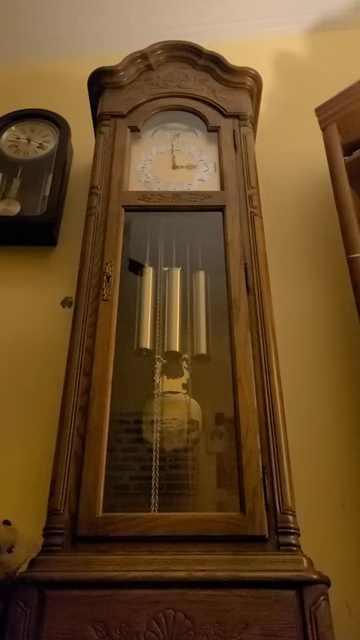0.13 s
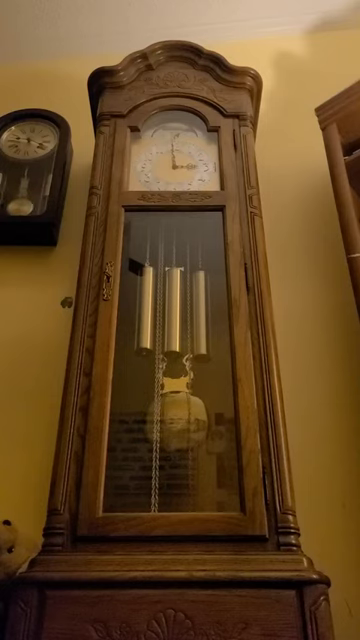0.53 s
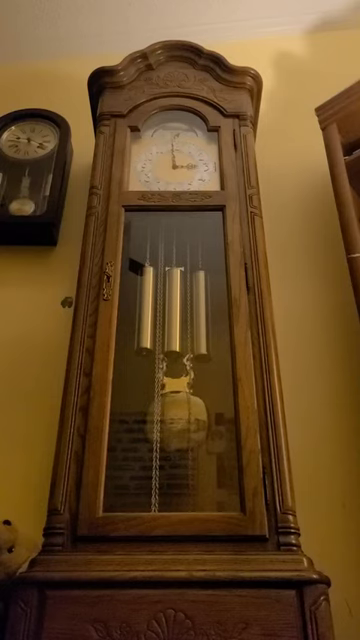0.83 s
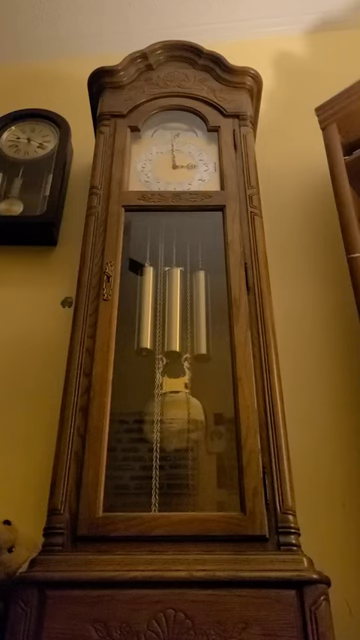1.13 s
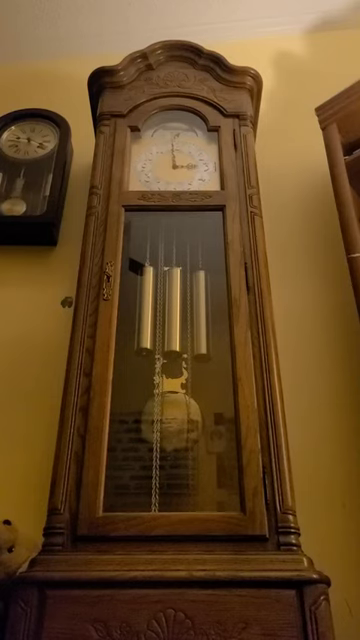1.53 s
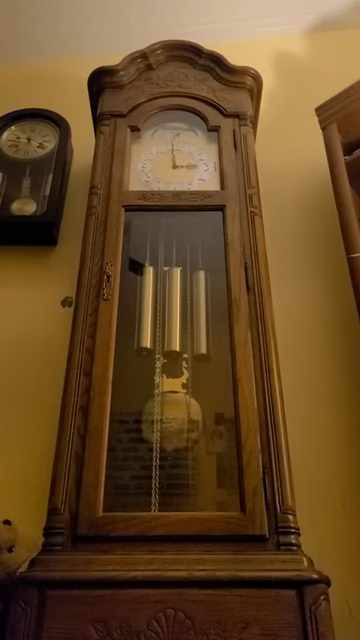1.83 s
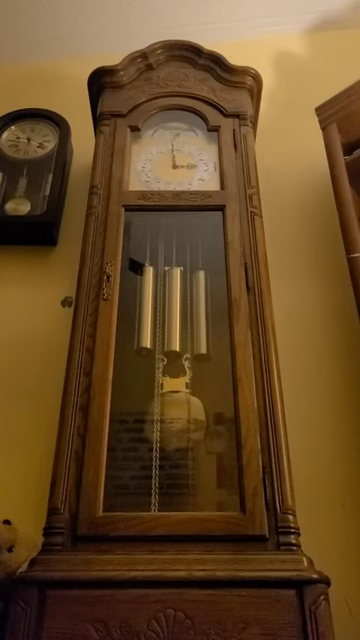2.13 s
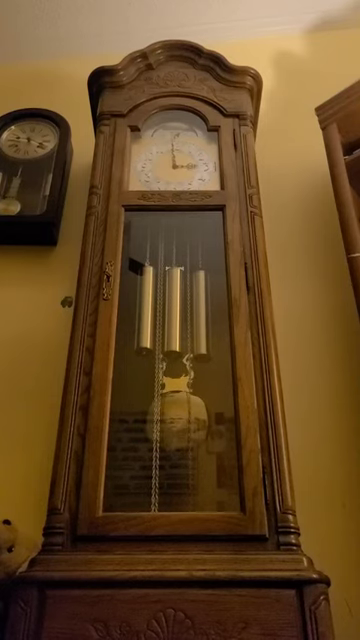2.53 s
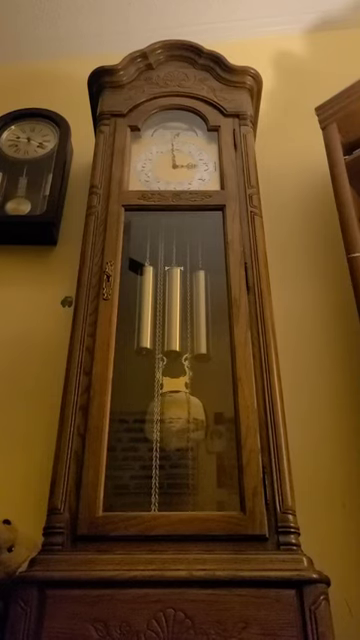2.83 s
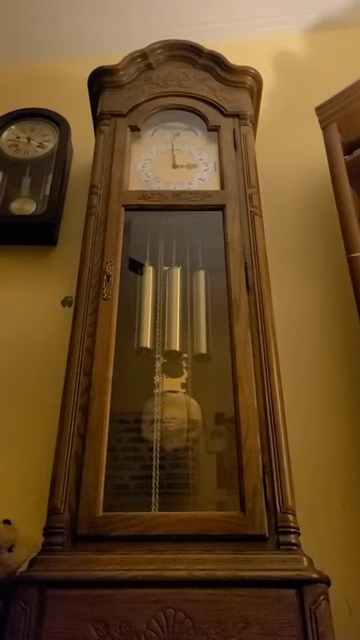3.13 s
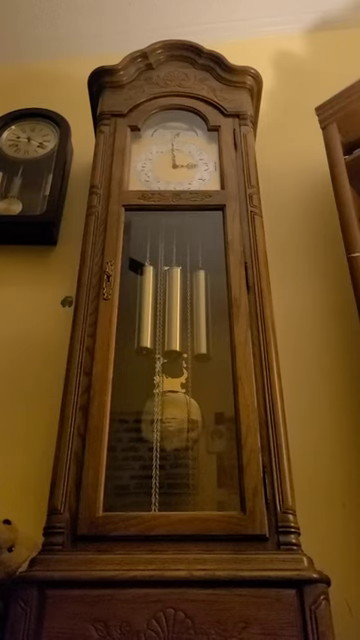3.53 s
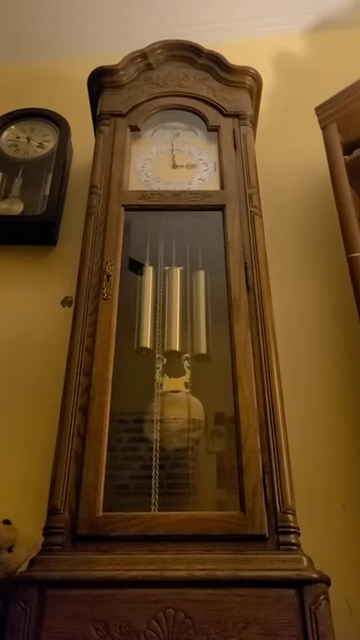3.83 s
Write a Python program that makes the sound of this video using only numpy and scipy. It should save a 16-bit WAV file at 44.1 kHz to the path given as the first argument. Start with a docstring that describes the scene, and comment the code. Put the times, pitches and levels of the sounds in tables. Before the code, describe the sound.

Slow tick-tock of a tall pendulum clock, with fainter clocks and a low room rumble.

```python
"""A longcase pendulum clock ticks, slightly out of beat, in a quiet room.
Each drop of the escapement is an impact: it cracks, excites the damped modes of the brass movement
and reverberates in the wooden case and the room. Two much fainter clocks keep their own quicker
beats, and a few thin clicks sound close by near the end, all over a low room rumble."""
import sys
import numpy as np
from scipy import signal
from scipy.fft import rfft, irfft, next_fast_len
from scipy.io import wavfile

SR = 44100
rng = np.random.default_rng(int(sys.argv[2]) if len(sys.argv) > 2 else 0)


def generate_wav(signal):
    """Clip the signal to [-1, 1] and save it as 16-bit WAV at the path in sys.argv[1]."""
    frames = np.transpose(np.atleast_2d(signal))
    scaled = np.clip(frames, -1, 1) * 32767
    pcm = np.round(scaled).astype(np.int16)
    wavfile.write(sys.argv[1], SR, pcm)


N = 175077

# spectrum of the room's rumble and hiss: frequency_hz, density_db
ROOM_SPECTRUM = [(20, -10), (42, -5.5), (52, -5), (66, 0.5), (85, -4), (112, 0.5), (135, -13.5), (165, -9),
                 (270, -20.5), (400, -21), (600, -28.5), (1000, -39.5), (2000, -42), (3000, -42.5),
                 (5000, -54), (9000, -57.5), (15000, -60)]
# narrow hums in the room: pitch_hz, width_hz, level_db
ROOM_HUMS = [(66.4, 5, -59), (220.7, 3.2, -63), (257.5, 11, -72.5), (435, 3.1, -77.5), (740, 1.8, -82)]
# balance of the room noise: frequency_hz, right_minus_left_db
ROOM_BALANCE = [(200, 2.7), (900, 4.5), (3500, 1.5), (8000, -2.5)]
# drops on the first and second pallet: start_s, level_db, ring_db, tilt_db_per_octave, accent_db
TICK_DROPS = [(.1025, 1.5, -9, 1, 7), (1.2890, -0.5, 2, 1, 0), (2.4705, 0, -1, 0.5, 1),
              (3.6495, -0.5, 1.5, 0.5, 0)]
TOCK_DROPS = [(.6630, 0.5, 0.5, -1.5, -2), (1.8445, 1, 0, -2, -0.5), (3.0275, 1, -4, -2.5, 0.5)]
# response of the wooden case to each pallet: frequency_hz, density_db
TICK_CASE_SPECTRUM = [(500, -13), (1000, -21), (1400, -8), (1580, -2), (1760, -9.5), (2100, -1.5),
                      (2400, -9.5), (3080, 0), (3550, -10.5), (4100, -28), (4700, -9), (5600, -20),
                      (7000, -22.5), (9800, -40), (11500, -32), (15000, -47)]
TOCK_CASE_SPECTRUM = [(500, -28.5), (1000, -35), (1250, -13), (1580, -12.5), (1760, -10.5), (2200, 0),
                      (2380, -7), (2750, 5.5), (3250, -3.5), (3600, -8.5), (4150, -22), (4700, -5.5),
                      (5700, -17.5), (7500, -35.5), (8100, -15), (9600, -69), (11600, -19), (15000, -42.5)]
# crack of tooth on pallet: frequency_hz, density_db
CRACK_SPECTRUM = [(600, -26.5), (1550, -14.5), (1900, -8), (2800, 8.5), (3500, -2), (4100, -13), (4800, -4),
                  (6000, -22.5), (9500, -32), (11500, -24.5), (15000, -31)]
# early reflections of the crack from case and walls: delay_s, level_db
CRACK_ECHOES = [(0.0143, -10.5), (.0235, -7), (0.035, -11.5)]
# modes of the brass movement: pitch_hz, t60_s, tick_db, tock_db
BRASS_MODES = [(1600.5, 0.31, 1.5, -11.5), (1537, 0.055, -14, -5.5), (1616, 0.17, 3, -8.5),
               (1718, 0.4, -19, -33), (1923, .32, -13.5, -29), (2030, 0.26, -17, -16),
               (2145, 0.41, -16, -15.5), (2260, 0.22, -28, -14), (2593, .27, -13.5, -8),
               (2644, 0.32, -12.5, -13), (2728, .28, -17, -10), (2801, 0.24, -14, -6.5),
               (2850, .27, -26, -31), (2935, 0.22, -35, -6), (3036, 0.35, -10, -12), (3100, 0.2, -29, -20),
               (3300, 0.18, -11, -20), (3557, 0.23, -11.5, -11), (4680, 0.41, -26, -23.5)]
# beats of the wall clock: start_s, level_db
WALL_CLOCK_BEATS = [(.255, 3.5), (.655, 0), (1.055, 1), (1.454, 3.5), (1.855, 10.5), (2.256, 4.5),
                    (2.655, -2.5), (3.055, 5.5), (3.857, 3.5)]
# modes of the wall clock: pitch_hz, t60_s, level_db
WALL_CLOCK_MODES = [(1159, 0.18, -65.5), (1225, 0.069, -78), (1540, 0.19, -65), (1610, 0.097, -66)]
# diffuse part of the wall clock's beat: frequency_hz, density_db
WALL_CLOCK_SPECTRUM = [(700, -18), (1050, -31.5), (1180, 7.5), (1360, -1), (1560, 3.5), (1750, -26),
                       (3000, -20), (6000, -30), (15000, -24)]
# beats of the small distant clock: start_s, level_db, pitch_hz
SMALL_CLOCK_BEATS = [(0.296, 2, 6200), (.608, 8, 4680), (.955, 4.5, 4850), (1.608, 1.5, 5000),
                     (2.278, 0.5, 6100), (2.955, 7.5, 5440), (3.285, 2.5, 6100), (3.609, -1, 4800),
                     (3.95, 1, 4900)]
# broad spectrum beneath the small clock's resonance: frequency_hz, density_db
SMALL_CLOCK_SPECTRUM = [(800, 4), (1700, 1), (3000, 2.5), (8000, -7.5), (15000, -21)]
# thin clicks close by: start_s, level_db, right_minus_left_db, tilt_db_per_octave
NEAR_CLICKS = [(3.2512, -5.5, 7, 0), (3.2792, -1, 9.5, -2.5), (3.449, -9, 13, -2), (3.4582, 1.5, 10, -1)]
# spectrum of a click: frequency_hz, density_db
CLICK_SPECTRUM = [(100, -2), (400, -6), (700, 0), (1100, -2), (1500, -1.5), (2000, -18), (2800, -6.5),
                  (5000, -15.5), (7500, -17), (10000, -25), (15000, -24)]

CASE_DB, BRASS_DB, SLIDE_DB, TAIL_DB = -46, -39.5, -8.5, -23
ROOM_DB, WALL_DB, SMALL_DB, CLICK_DB = -48, -70, -76, -39.5
SLIDE_S, CRACK_S, RING_RISE_S, TREBLE_DECAY_S = 0.0072, 0.0028, 0.004, 0.41  # time constants
CASE_HOLD_S, CASE_CORRELATION = 0.041, 0.017
VARIATION = 0.3  # amplitude share of the case noise that is new on each beat


def undb(db):
    """Amplitude grows tenfold for every 20 dB."""
    return 10 ** (np.asarray(db) / 20)


def fade(t, t60, hold_s=0):
    """Exponential decay: after the hold, 60 dB is lost every t60 seconds."""
    return np.exp(-np.log(1000) * np.maximum(t - hold_s, 0) / t60)


def rise(t, rise_s):
    """Exponential build-up toward full amplitude."""
    return 1 - np.exp(-t / rise_s)


def pan(db):
    """Interaural level difference: left and right gains, the right louder by db."""
    return undb(np.array([[-db], [db]]) / 2)


def noise_pair(size, correlation):
    """Partial coherence: sum and difference of two noises give correlated left and right."""
    mid, side = rng.standard_normal((2, size))
    return np.sqrt((1 + correlation) / 2) * mid + np.sqrt((1 - correlation) / 2) * np.array([side, -side])


def curve(points, tilt_db=0):
    """Spectral envelope in dB against log frequency, tilted by tilt_db per octave."""
    hz, db = np.array(points).T
    return lambda f: np.interp(np.log(f), np.log(hz), db + tilt_db * np.log2(hz / hz.mean()))


def peak(f, centre_hz, width_oct):
    """Spectral peak of unit height, Gaussian in log frequency."""
    return np.exp(-(np.log2(f / centre_hz) / width_oct) ** 2)


def colour(x, db_at):
    """Minimum-phase filtering to a spectral envelope; white noise keeps its power."""
    n = 2 * next_fast_len(x.shape[-1])
    gain = undb(db_at(np.maximum(np.fft.rfftfreq(n, 1 / SR), 1)))
    cepstrum = irfft(np.log(gain / np.sqrt(np.mean(gain ** 2))))
    cepstrum[1:n // 2] *= 2  # folding onto positive time makes the filter causal
    cepstrum[n // 2 + 1:] = 0
    return irfft(rfft(x, n) * np.exp(rfft(cepstrum)))[..., :x.shape[-1]]


def room_noise():
    """A diffuse field is coherent only at long wavelengths: shared rumble and hums, scattered hiss."""
    f = np.fft.rfftfreq(N, 1 / SR)
    mid, side = rfft(rng.standard_normal((2, N)))
    coherence = 0.88 / (1 + (f / 690) ** 2)  # halved at 690 Hz
    air = np.sqrt(1 + coherence) * mid + np.sqrt(1 - coherence) * np.array([side, -side])
    out = undb(ROOM_DB) * colour(irfft(air, N) / np.sqrt(2), curve(ROOM_SPECTRUM))
    for hz, width_hz, db in ROOM_HUMS:
        hum = irfft(rfft(rng.standard_normal(N)) / (1 + (2 * (f - hz) / width_hz) ** 2), N)
        out += undb(db) * hum / hum.std()
    balance_db = curve(ROOM_BALANCE)(np.maximum(f, 1))
    return irfft(rfft(out) * undb(np.array([-balance_db, balance_db]) / 2), N)


def add(out, start_s, sound):
    """Superposition: a sound adds to the mix from start_s onward."""
    i = max(int(start_s * SR), 0)
    out[:, i:i + sound.shape[1]] += sound[:, :max(N - i, 0)]


def tooth_slide(t):
    """Sliding friction: noise swells as the tooth leaves the pallet just before the drop."""
    return undb(SLIDE_DB) * noise_pair(len(t), CASE_CORRELATION) * np.exp(-t[::-1] / SLIDE_S)


def case_reverberation(t, shared_noise, rise_s):
    """Dense reflections build up, hold and decay; damping takes the treble first."""
    envelope = rise(t, rise_s) * (fade(t, t60=0.27, hold_s=CASE_HOLD_S) + undb(TAIL_DB) * fade(t, t60=0.9))
    new_noise = noise_pair(len(t), CASE_CORRELATION)
    reflections = envelope * (np.sqrt(1 - VARIATION ** 2) * shared_noise + VARIATION * new_noise)
    treble = signal.sosfilt(signal.butter(1, 7000, "high", fs=SR, output="sos"), reflections)
    return reflections - treble * rise(t, TREBLE_DECAY_S)


def tooth_crack(t, left_lag_s=0.00056):
    """A brief impact is broadband; it reaches the right ear first, and early reflections follow."""
    right = rng.standard_normal(len(t)) * np.exp(-t / CRACK_S)
    left = np.interp(t - left_lag_s, t, right, left=0)
    echoes = sum(undb(db) * (t >= lag) * np.exp(-np.abs(t - lag) / CRACK_S) for lag, db in CRACK_ECHOES)
    return np.array([left, right]) + echoes * noise_pair(len(t), 0)


def brass_ring(t, mode_db, phases, accent):
    """Free vibration: the movement rings in damped modes, varying a little in level and pitch."""
    ring = np.zeros((2, len(t)))
    for (hz, t60, _, _), db, phase in zip(BRASS_MODES, mode_db, phases):
        jitter_db, detune = rng.normal(0, (1, 0.0012))
        amplitude = undb(db + 2 * accent(hz) + jitter_db) * fade(t, t60)
        ring += amplitude * np.sin(2 * np.pi * hz * (1 + detune) * t + phase)
    return ring * rise(t, RING_RISE_S)


def pallet(drops, case_spectrum, mode_db, crack_db, rise_s):
    """Impact excitation: each drop on one pallet sums slide, reverberation, crack and ringing brass."""
    out, t = np.zeros((2, N)), np.arange(SR * 3 // 5) / SR
    slide_t = t[:SR // 40]
    shared_noise = noise_pair(len(t), CASE_CORRELATION)
    phases = rng.uniform(0, 2 * np.pi, (len(BRASS_MODES), 1, 1))
    phases = phases + rng.normal(0, 0.6, (len(BRASS_MODES), 2, 1))  # offset at each ear
    for start_s, db, ring_db, tilt_db, accent_db in drops:
        accent = lambda f: accent_db * peak(f, centre_hz=3250, width_oct=0.16)
        reverberation = case_reverberation(t, shared_noise, rise_s)
        case = np.hstack([tooth_slide(slide_t), reverberation])
        case = colour(case, lambda f: curve(case_spectrum, tilt_db)(f) + accent(f))
        crack = colour(tooth_crack(t), lambda f: curve(CRACK_SPECTRUM)(f) + accent(f))
        add(out, start_s - slide_t[-1], undb(CASE_DB + db) * case)
        add(out, start_s, undb(crack_db + db) * crack)
        add(out, start_s, undb(BRASS_DB + db + ring_db) * brass_ring(t, mode_db, phases, accent))
    return out


def longcase_clock():
    """Modal weighting: tick and tock excite the same modes in different proportions."""
    _, _, tick_db, tock_db = np.array(BRASS_MODES).T
    ticks = pallet(TICK_DROPS, TICK_CASE_SPECTRUM, tick_db, crack_db=-38.5, rise_s=0.0013)
    tocks = pallet(TOCK_DROPS, TOCK_CASE_SPECTRUM, tock_db, crack_db=-34.5, rise_s=0.0069)
    return (ticks + tocks) * pan(db=4)


def diffuse_beat(t, rise_s, hold_s, t60):
    """Reverberation blurs a distant tick into decaying noise, independent at each ear."""
    return noise_pair(len(t), 0) * rise(t, rise_s) * fade(t, t60, hold_s)


def wall_clock():
    """Two pairs of damped modes give a soft two-toned beat, blurred by the room."""
    out, t = np.zeros((2, N)), np.arange(SR // 2) / SR
    for start_s, db in WALL_CLOCK_BEATS:
        for hz, t60, mode_db in WALL_CLOCK_MODES:
            phase = rng.uniform(0, 2 * np.pi) + rng.normal(0, 0.62, (2, 1))
            amplitude = undb(db + mode_db) * rise(t, RING_RISE_S) * fade(t, t60)
            add(out, start_s, amplitude * np.sin(2 * np.pi * hz * t + phase))
        beat = diffuse_beat(t, rise_s=0.002, hold_s=0.0096, t60=0.52)
        add(out, start_s, undb(WALL_DB + db) * colour(beat, curve(WALL_CLOCK_SPECTRUM)))
    return out * pan(db=1)


def small_clock():
    """A narrow resonance above a broad spectrum gives each faint, distant beat a high pitch."""
    out, t = np.zeros((2, N)), np.arange(SR // 2) / SR
    body_db = curve(SMALL_CLOCK_SPECTRUM)
    for start_s, db, hz in SMALL_CLOCK_BEATS:
        resonance_db = lambda f: 20 * np.log10(peak(f, hz, width_oct=0.065) + undb(body_db(f) - 5))
        beat = diffuse_beat(t, rise_s=0.0027, hold_s=0.034, t60=0.28)
        add(out, start_s, undb(SMALL_DB + db) * colour(beat, resonance_db))
    return out * pan(db=1)


def near_clicks(snap_s=0.0009, tail_s=0.014, tail_db=-17.5):
    """Direct sound dominates at close range: dry, very short snaps with a weak tail."""
    out, t = np.zeros((2, N)), np.arange(SR // 10) / SR
    envelope = np.exp(-t / snap_s) + undb(tail_db) * np.exp(-t / tail_s)
    for start_s, db, pan_db, tilt_db in NEAR_CLICKS:
        snap = colour(envelope * noise_pair(len(t), correlation=0.72), curve(CLICK_SPECTRUM, tilt_db))
        add(out, start_s, undb(CLICK_DB + db) * pan(pan_db) * snap)
    return out


def scene():
    """Sound pressures add linearly; the clocks and clicks lie toward the right."""
    return longcase_clock() + wall_clock() + small_clock() + near_clicks() + room_noise()


def record(dry, silence_s=0.094, fade_in_s=0.0072, cutoff_hz=15400):
    """Gating and band limiting: the sound opens after a brief silence, and its top is cut steeply."""
    opening = np.clip((np.arange(N) / SR - silence_s) / fade_in_s, 0, 1)
    lowpass = signal.ellip(8, 0.2, 70, cutoff_hz, fs=SR, output="sos")
    return signal.sosfilt(lowpass, dry * opening)


dry = scene()
out = record(dry)
generate_wav(out)
```